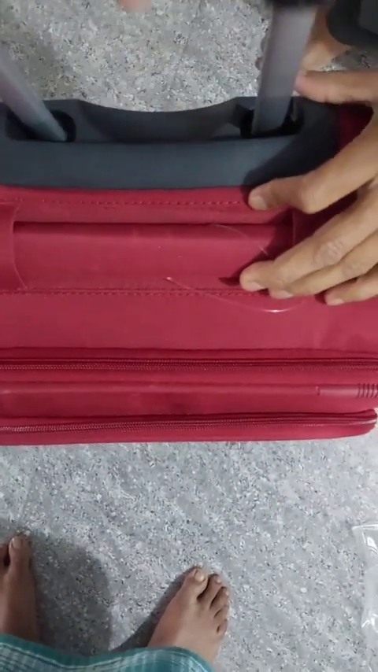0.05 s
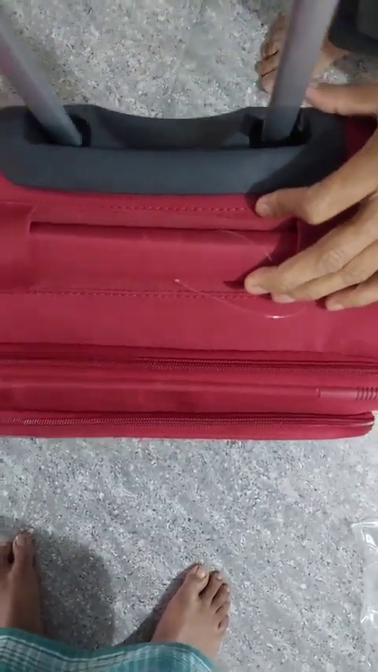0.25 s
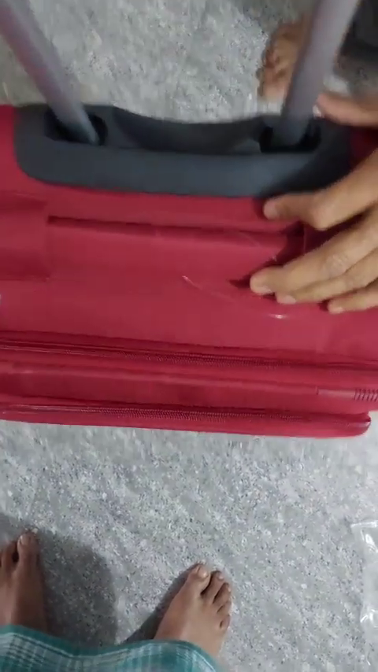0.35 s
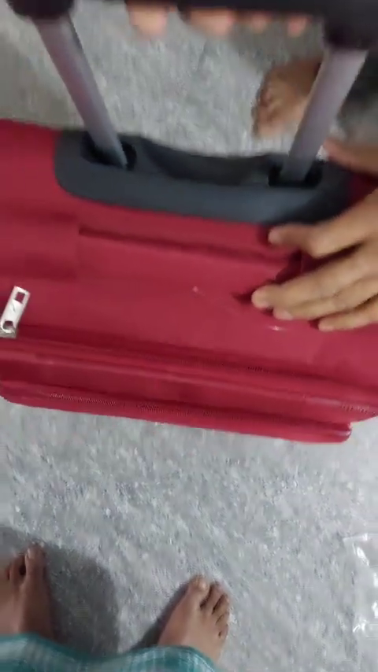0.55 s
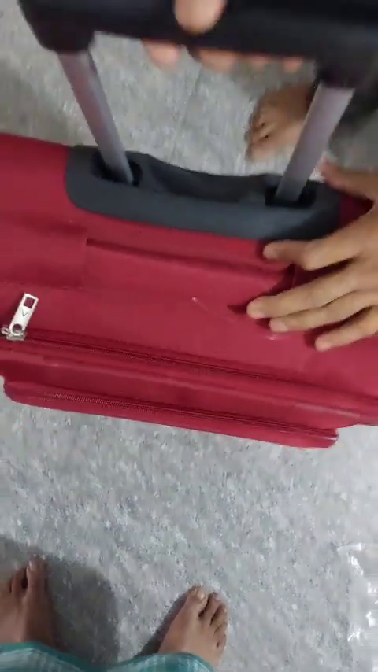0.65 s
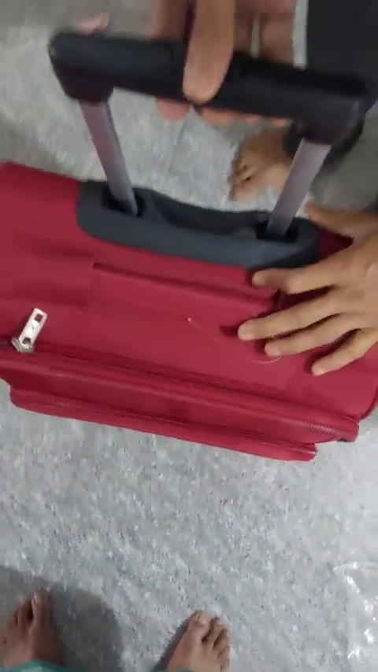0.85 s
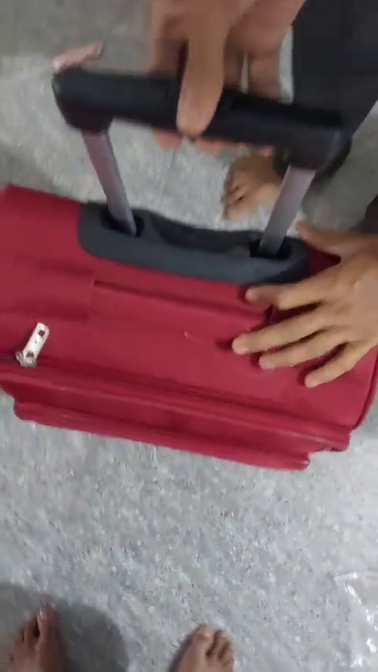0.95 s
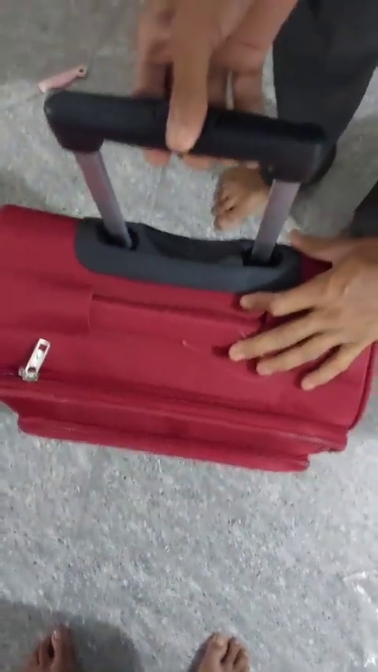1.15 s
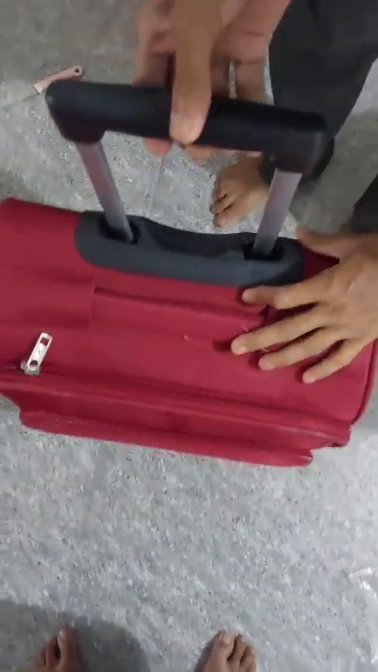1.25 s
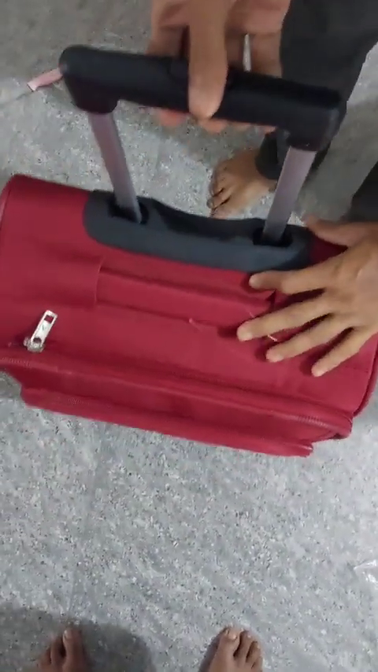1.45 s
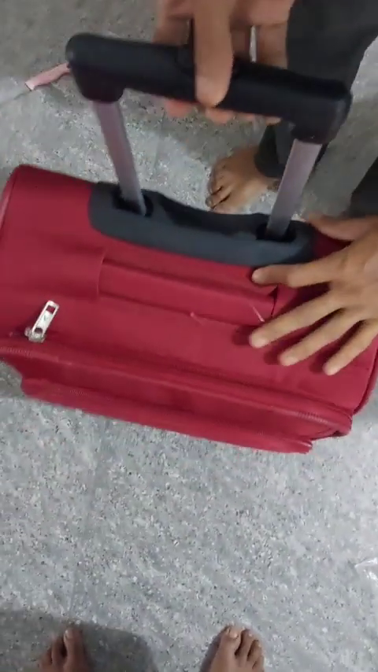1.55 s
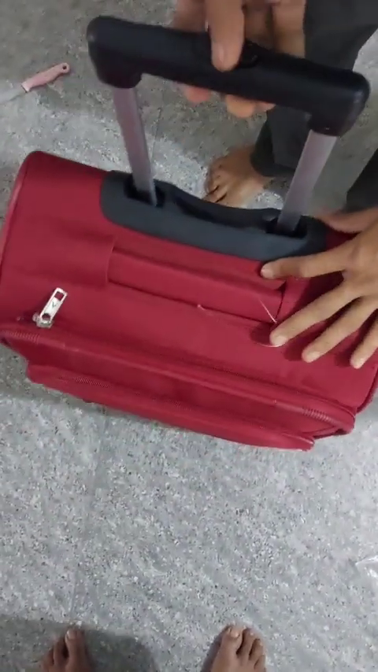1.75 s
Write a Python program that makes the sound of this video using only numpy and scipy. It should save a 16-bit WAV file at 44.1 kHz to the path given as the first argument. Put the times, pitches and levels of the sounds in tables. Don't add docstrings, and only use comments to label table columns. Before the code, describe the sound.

A suitcase's telescopic handle snaps through two stops, a rattling cluster of metal clicks with a dull case knock, then a tighter clack; faint zip tinkles and cloth rustle follow, close phone microphone, small hard room.

```python
import sys
import numpy as np
from scipy import signal
from scipy.fft import rfft, irfft, next_fast_len
from scipy.io import wavfile
from scipy.ndimage import uniform_filter1d

SR = 44100
rng = np.random.default_rng(int(sys.argv[2]) if len(sys.argv) > 2 else 0)


def int16_out(signal):
    q = np.round(np.clip(np.atleast_2d(signal).T, -1, 1) * 32767)
    wavfile.write(sys.argv[1], SR, q.astype(np.int16))


def convert_level_to_amplitude(level_db):
    exponent = np.asarray(level_db, float) / 20
    return 10 ** exponent


N = 79380

# frequency in Hz, level in dB.
HUM_TONE = [(40, 2.5), (80, 0), (250, -7), (500, -14), (1200, -24), (3000, -35.5), (6000, -39.5),
            (16000, -32)]
HUM_DB = -67

# time in seconds, level in dB, cavity pitch in Hz.
SLIDE = [
    (0, -47, 788.5),
    (.1, -55, 791),
    (.2, -55.5, 796),
    (.35, -59, 797.4),
    (.53, -71.5, 824.4),
    (.6, -66, 880),
    (.7, -61, 997),
    (.8, -65, 1170),
    (.9, -73.5, 1080),
]
# frequency in Hz, level in dB.
SLIDE_TONE = [(90, -15), (250, 2.5), (600, -10.5), (1300, -13), (1900, -9.5), (3100, -22), (6000, -19),
              (16000, -24)]
CAVITY_DB, OVERTONE_DB = -4, -17.5

# start in seconds, level in dB, contact time in ms, left-right balance in dB, pitch in Hz.
EARLY_PINS = [
    (.0003, -20.5, 3.9, 0, 5840),
    (.025, -44.5, 8, 0, 3500),
    (.0892, -39, 5, -2, 3130),
    (.1067, -38, 12, 0, 4300),
]
FIRST_PINS = [(.2045, -41, 5.7, 2, 3510), (.2075, -35.5, 5, 2.5, 3300), (.2112, -18.5, 9.9, 1.5, 2800),
              (.2126, -14.5, 9.2, -3, 7120), (.2145, -21.5, 3.1, -5, 4576), (.2174, -3, .6, 3, 2948),
              (.2192, -14.5, 1.2, -14.5, 5370), (.2222, -22.5, 2.5, 4, 1913), (.2325, -22, 5.8, -8, 6900),
              (.2245, -18, 2, -7.5, 5000), (.2432, -16.5, 3.2, 3, 7500), (.2472, -15.5, 1.15, -12, 8240),
              (.287, -40, 1.2, -16, 13940)]
SMALL_TICKS = [
    (.6955, -42, 3.46, -1.07, 4020),
    (.6962, -44, 1.5, -1, 6000),
    (1.202, -63, 6.4, 0.19, 3220),
    (1.28, -64.5, 14, 0.24, 2620),
    (1.371, -64.5, 1, 0, 3450),
]
SECOND_PINS = [
    (.8148, -28, 1.5, 1.5, 5200),
    (.8160, -26, 2, -4.5, 5104),
    (.8170, -11, 1.3, 1.5, 2125),
    (.8176, -13.5, 1.2, 4, 5990),
    (.8194, -18, 1.6, -7, 5555),
    (.8222, -16.5, 2.5, 5.5, 2077),
    (.8275, -30, 2, 8, 5200),
    (.8352, -27, 1.5, -3, 2172),
    (.8405, -24, 2, 3, 2150),
    (.8462, -30.5, 3, -9, 2214),
]
# frequency in Hz, level in dB.
EARLY_TONE = [(500, -25.5), (2000, -7), (2800, 3.5), (6500, -11.5), (9000, -10.5), (16000, -21.5)]
FIRST_TONE = [(200, -44.5), (500, -19.5), (1400, -8.5), (1950, 2.5), (3400, -15), (4900, -9), (8500, -15),
              (16000, -16.5)]
TICK_TONE = [(700, -24), (2000, -8.5), (4000, -13), (8000, -12), (9000, -32), (16000, -23.5)]
SECOND_TONE = [(150, -50), (400, -33.5), (800, -14.5), (1080, -26), (1400, -12), (2140, -4.5),
               (3600, -16.5), (5150, -13.5), (16000, -23)]
# frequency in Hz, level in dB, t60 in seconds.
FIRST_MODES = [(520, -19.5, 0.022), (657, -21, .1), (750, -24.5, .08), (1100, -13, 0.05), (1798, -9.5, .2),
               (1950, -1, 0.1), (2300, -11, 0.05), (2500, -6, .06), (2740, -8, 0.038), (3115, -13, .02),
               (4840, -12.5, 0.11), (4996, -13, 0.047), (6830, -9.5, 0.04), (7560, -10, .04)]
SECOND_MODES = [(259.3, -23, 0.31), (402, -25.5, 0.12), (760, -25.5, 0.071), (880, -14.5, 0.056),
                (1220, -31.5, 0.51), (1591, 1.5, 0.057), (1929, -2, 0.045), (2122, -8, 0.16),
                (2130, -36, 0.71), (2143, -15, 0.26), (2207, -10.5, 0.061), (2585, -20.5, 0.048),
                (2896, -17, 0.13), (5142, -18, 0.0085)]
FOCUS_DB, FOCUS_OCT = 8.5, 0.27
RATTLE, RATTLE_HZ = .8, 45

# start in seconds, level in dB, pitch in Hz, t60 in seconds, left-right balance in dB.
THUDS = [
    (0.002, -40.5, 224.4, 0.18, -2),
    (0.224, -40.5, 109, 0.14, -6),
    (.232, -30.5, 536.6, .05, -10),
    (.2445, -25, 660, 0.06, -10.5),
    (0.245, -40.5, 73, 0.14, -4),
    (0.259, -33.5, 191.2, 0.073, -2),
]

# frequency in Hz, level in dB, t60 in seconds.
ZIP_MODES = [(7897, 0, .16), (8925, -1, .14), (9625, -10, .1), (12240, -16, .2), (12680, -6, .2),
             (13240, -2, .13), (13610, -7, .14), (14100, -8, .1), (14530, -2, .14), (14850, -8, .13),
             (15150, -9, .13), (15390, -1, .11)]
# start in seconds, level in dB, favoured pitch in Hz, reach in octaves.
ZIP_KNOCKS = [(.325, -66, 12550, .6), (.352, -54, 8040, 0.76), (.374, -57, 12000, 0.79),
              (.428, -57, 13000, .5), (.463, -54.5, 9000, .6), (.578, -63, 14100, .05),
              (.608, -59, 13500, .06), (1.157, -65, 7897, .1), (1.162, -66, 12680, .04),
              (1.18, -67, 7897, .05), (1.205, -69.5, 8050, .05), (1.25, -65, 7897, .05),
              (1.2994, -51.5, 11000, 1.7), (1.318, -61, 14000, 0.48), (1.36, -65, 7897, .1),
              (1.4215, -44, 12240, .015), (1.4225, -71.5, 7897, .1)]
ZIP_SCATTER_DB, ZIP_SPLIT_HZ = 1.5, 150

# time in seconds, hiss level in dB, crumple level in dB.
CLOTH = [
    (.9, -84.5, -91.5),
    (1.12, -94, -106),
    (1.19, -86, -70),
    (1.28, -79.5, -68),
    (1.36, -77.5, -86),
    (1.48, -84.5, -87),
    (1.56, -63, -71),
    (1.65, -65.5, -79),
    (1.8, -70.5, -82.5),
]
# frequency in Hz, level in dB.
CLOTH_TONE = [(600, -32), (1080, -5.5), (1570, -10), (2900, -24), (4000, -8.5), (8800, -10), (16000, -7)]
CRUMPLE_TONE = [(80, -14.5), (200, 5.5), (400, -4.5), (1000, -13.5), (1055, -6), (1110, -16), (1700, -20),
                (3000, -32.5)]

# frequency in Hz, t60 in seconds.
ROOM_T60 = [(150, .42), (500, 0.3), (1000, 0.34), (2000, 0.36), (4000, 0.32), (8000, 0.23), (14000, 0.25)]
ROOM_DB, ROOM_GAP_S, ROOM_RISE_S = -2.5, 0.0046, 0.0093

# frequency in Hz, level in dB.
LEFT_MIC = [(25, -20), (70, -3), (7500, 1.5), (10000, -2), (13500, 1)]
RIGHT_MIC = [(25, -20), (70, -3), (7500, 1.5), (10000, 0), (13500, 4)]
LEFT_LAG_S, TOP_HZ = .00027, 15750


def unit(x):
    return x / np.sqrt(np.mean(x ** 2) + 1e-30)


def colour(x, tone):
    hz, db = np.array(tone, float).T
    n = next_fast_len(x.shape[-1])
    f = np.maximum(np.arange(n // 2 + 1) * SR / n, 1)
    gain = convert_level_to_amplitude(np.interp(np.log(f), np.log(hz), db))
    return irfft(rfft(x, n) * gain, n)[..., :x.shape[-1]]


def line(table, col):
    rows = np.array(table, float)
    return np.interp(np.arange(N) / SR, rows[:, 0], rows[:, col])


def walk(rate):
    k = int(SR / rate)
    steps = np.repeat(rng.standard_normal(N // k + 1), k)
    return unit(uniform_filter1d(uniform_filter1d(steps, k), k)[:N])


def ring(modes, gains):
    t = np.arange(SR * 3 // 4) / SR
    total = 0
    for (hz, db, t60), gain in zip(modes, gains):
        decay = np.exp(-np.log(1000) * t / max(t60, .003))
        total = total + gain * convert_level_to_amplitude(db) * np.sin(2 * np.pi * hz * t) * decay
    return total


def add(out, s, x):
    i = int(np.clip(s * SR, 0, N - 1))
    out[..., i:i + x.shape[-1]] += x[..., :N - i]


def spread(x, pan_db):
    late = np.concatenate([np.zeros(int(LEFT_LAG_S * SR)), x])[:len(x)]
    return np.array([late * convert_level_to_amplitude(pan_db / 2), x * convert_level_to_amplitude(-pan_db / 2)])


def wide(tone, alike_hz):
    mid, side = colour(rng.standard_normal((2, N)), tone)
    side = signal.sosfilt(signal.butter(1, alike_hz, "high", fs=SR, output="sos"), side)
    return unit(np.array([mid + side, mid - side]))


def causal(db):
    c = irfft(db * np.log(10) / 20)
    c[1:1024] *= 2
    c[1025:] = 0
    return irfft(np.exp(rfft(c)))[:1536]


def hum():
    return wide(HUM_TONE, 150) * convert_level_to_amplitude(HUM_DB + 0.56 * walk(2))


def hollow(phase, ratio, width_hz):
    shared = np.sin(ratio * phase) * walk(width_hz)
    own = np.cos(ratio * phase) * np.array([walk(width_hz), walk(width_hz)])
    return unit(shared + own)


def slide():
    pitch = line(SLIDE, 2)
    phase = 2 * np.pi * np.cumsum(pitch) / SR
    rub = wide(SLIDE_TONE, 400) * convert_level_to_amplitude(walk(430))
    cavity = convert_level_to_amplitude(CAVITY_DB) * hollow(phase, 0.93, 350) + convert_level_to_amplitude(OVERTONE_DB) * hollow(phase, 1.8, 500)
    cavity_level = convert_level_to_amplitude(0.074 * np.minimum(pitch - 900, 0))
    return convert_level_to_amplitude(line(SLIDE, 1)) * (rub + cavity_level * cavity)


def pins(table, tone, modes, ring_db, alike, focus_oct=FOCUS_OCT):
    out, t, length = np.zeros((2, N)), np.arange(1024) / SR, SR * 3 // 4
    f = np.log2(np.maximum(np.arange(1025) * SR / 2048, 20))
    tone_hz, tone_db = np.array(tone).T
    base_db = np.interp(f, np.log2(tone_hz), tone_db)
    focus_db = FOCUS_DB * np.sqrt(FOCUS_OCT / focus_oct)
    flutter = np.array([[1 + RATTLE * walk(RATTLE_HZ)[:length] for _ in modes] for _ in range(2)])
    for s, db, ms, pan_db, hz in table:
        shape = causal(base_db + focus_db * np.exp(-.5 * ((f - np.log2(hz)) / focus_oct) ** 2))
        a, b = rng.standard_normal((2, 1024)) * np.exp(-t * 1000 / ms)
        pushes = (a, alike * a + np.sqrt(max(1 - alike ** 2, 0)) * b)
        gains = 1 + .3 * rng.standard_normal((2, len(modes)))
        for ch, push in enumerate(pushes):
            fluttering = [g * w for g, w in zip(gains[ch], flutter[ch])]
            body = ring(modes, fluttering) * convert_level_to_amplitude(ring_db) + np.zeros(length)
            crack = np.convolve(push, shape)
            body[:len(crack)] += crack / np.abs(crack).max()
            add(out[ch], s, convert_level_to_amplitude(db) * spread(body, pan_db)[ch])
    return signal.sosfilt(signal.butter(3, 210, "high", fs=SR, output="sos"), out)


def case():
    out, t = np.zeros((2, N)), np.arange(SR * 3 // 4) / SR
    for s, db, hz, t60, pan_db in THUDS:
        swell = np.minimum(t * hz / 0.53, 1)
        knock = ring([(hz, 0, t60), (1.2 * hz, -4, 0.63 * t60)], [1, 1]) * swell
        add(out, s, convert_level_to_amplitude(db) * spread(knock, pan_db))
    return out


def zips():
    out = np.zeros((2, N))
    mode_hz = np.array(ZIP_MODES)[:, 0]
    for s, db, best_hz, reach in ZIP_KNOCKS:
        shared, apart, detune = rng.standard_normal((3, len(ZIP_MODES)))
        twins = [(hz + ZIP_SPLIT_HZ * d, v - 4, t60) for (hz, v, t60), d in zip(ZIP_MODES, detune)]
        favour = np.exp(-.5 * (np.log2(mode_hz / best_hz) / max(reach, .005)) ** 2)
        gains = [favour * convert_level_to_amplitude(ZIP_SCATTER_DB * (shared + k * apart)) for k in (-1, 1)]
        tinkle = np.array([ring(ZIP_MODES, g) + ring(twins, g) for g in gains]) / 4
        add(out, s, convert_level_to_amplitude(db) * tinkle)
    bright = signal.sosfilt(signal.butter(4, 7200, "high", fs=SR, output="sos"), out)
    return bright * convert_level_to_amplitude(2.5 * walk(170))


def cloth():
    hiss = wide(CLOTH_TONE, 300)
    crumple = wide(CRUMPLE_TONE, 350) * convert_level_to_amplitude(0.87 * walk(39))
    return convert_level_to_amplitude(line(CLOTH, 1)) * hiss + convert_level_to_amplitude(line(CLOTH, 2)) * crumple


def room(x):
    t = np.arange(SR * 2 // 3) / SR
    f = np.log(np.arange(len(t) // 2 + 1) * SR / len(t) + 1)
    centres = np.log(np.array(ROOM_T60)[:, 0])
    tail = 0
    for share, (hz, t60) in zip(np.eye(len(centres)), ROOM_T60):
        both, apart = rng.standard_normal((2, len(t)))
        width = min(hz / 700, 1)
        pair = (both + width * apart * np.array([[1], [-1]])) / np.hypot(1, width)
        band = irfft(rfft(pair) * np.sqrt(np.interp(f, centres, share)), len(t))
        tail = tail + band * np.exp(-np.log(1000) * t / t60)
    tail = tail * np.clip((t - ROOM_GAP_S) / ROOM_RISE_S, 0, 1)
    tail = tail / np.sqrt(np.sum(tail ** 2) / 2)
    source = x.mean(axis=0, keepdims=True)
    return convert_level_to_amplitude(ROOM_DB) * signal.fftconvolve(source, tail, axes=1)[:, :N]


def scene():
    early = pins(EARLY_PINS, EARLY_TONE, [], ring_db=0, alike=0.36)
    first_stop = pins(FIRST_PINS, FIRST_TONE, FIRST_MODES, ring_db=-17.5, alike=0.64)
    second_stop = pins(SECOND_PINS, SECOND_TONE, SECOND_MODES, ring_db=-15.5, alike=0.33)
    ticks = pins(SMALL_TICKS, TICK_TONE, [], ring_db=0, alike=0.75, focus_oct=.11)
    near = early + first_stop + second_stop + case() + zips()
    return near + ticks + room(near + ticks / 2) + slide() + cloth() + hum()


def roll_off(x):
    return signal.sosfilt(signal.butter(12, 16660, fs=SR, output="sos"), x)


def record(dry):
    mics = np.array([colour(dry[0], LEFT_MIC), colour(dry[1], RIGHT_MIC)])
    top_cut = signal.ellip(8, .2, 38, TOP_HZ, fs=SR, output="sos")
    mix = signal.sosfilt(top_cut, mics)
    return roll_off(mix)


dry = scene()
out = record(dry)
int16_out(out)
```